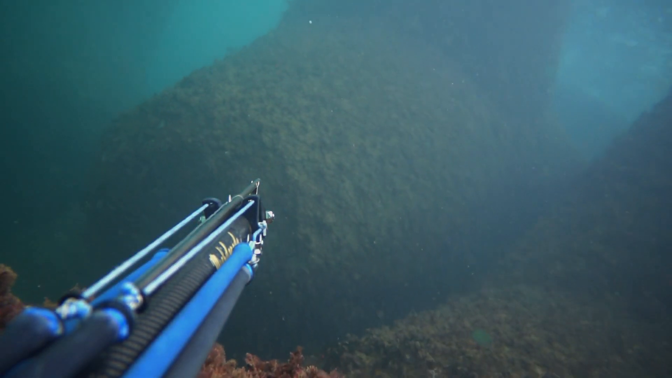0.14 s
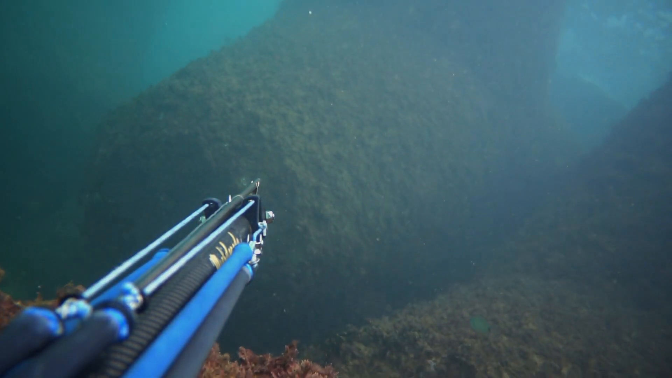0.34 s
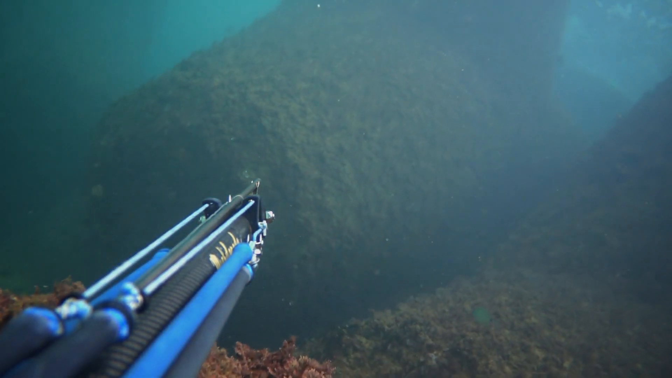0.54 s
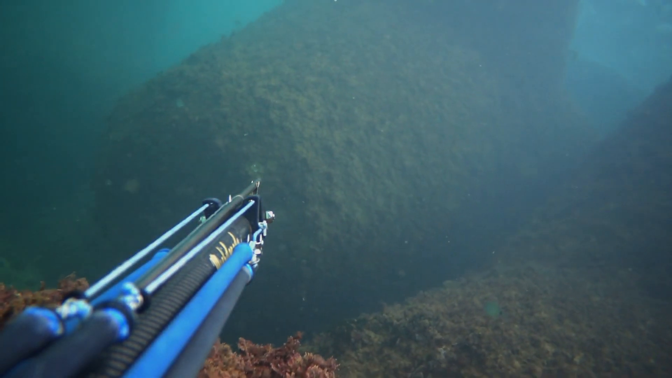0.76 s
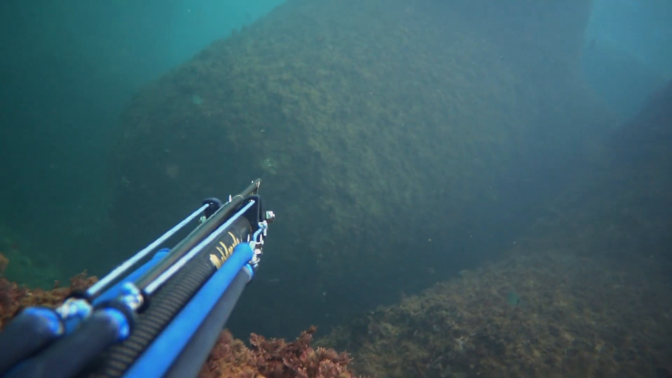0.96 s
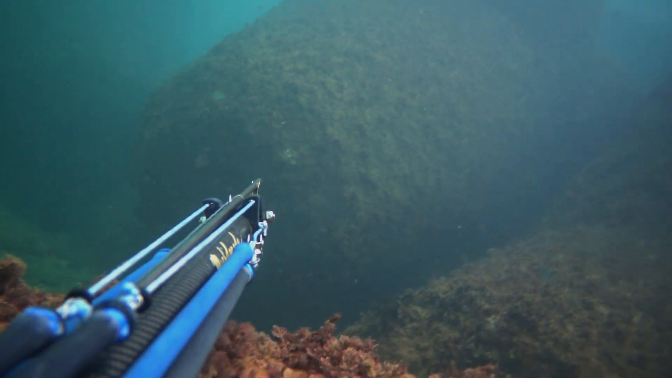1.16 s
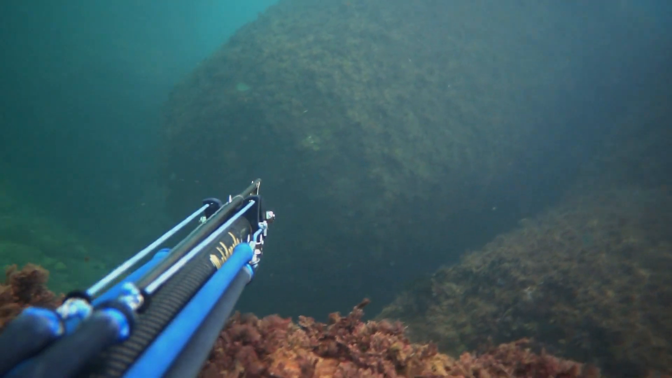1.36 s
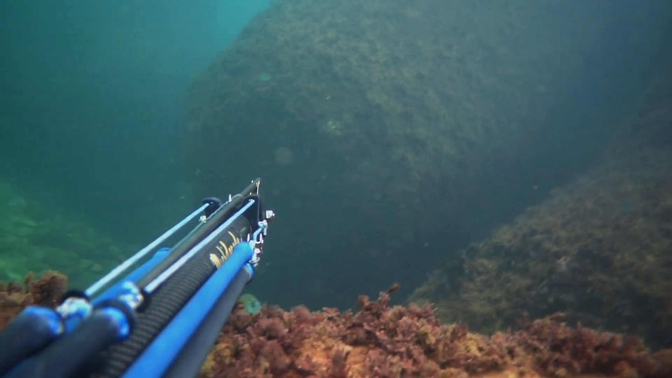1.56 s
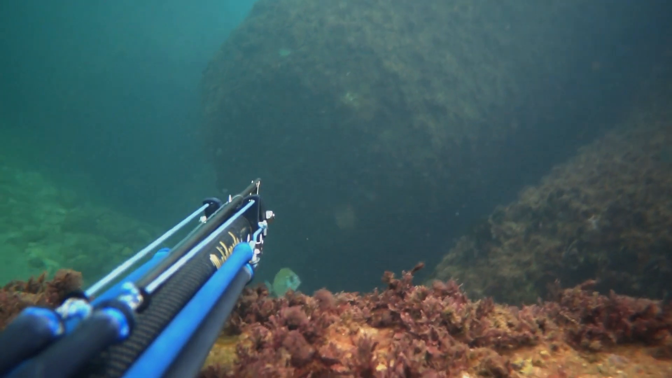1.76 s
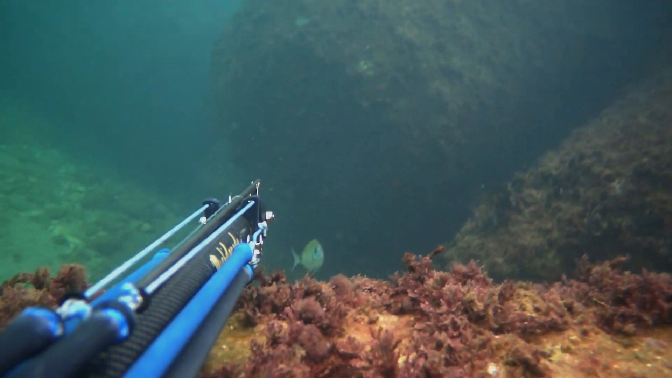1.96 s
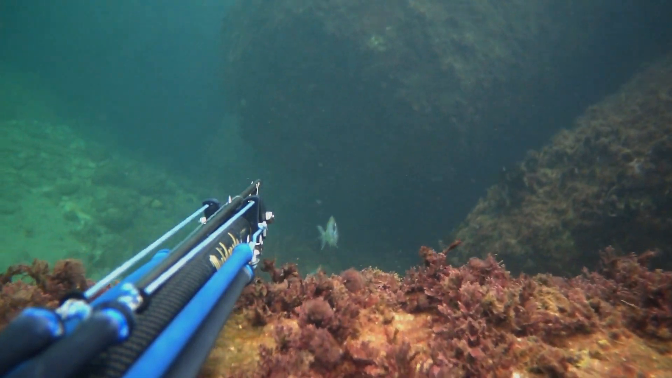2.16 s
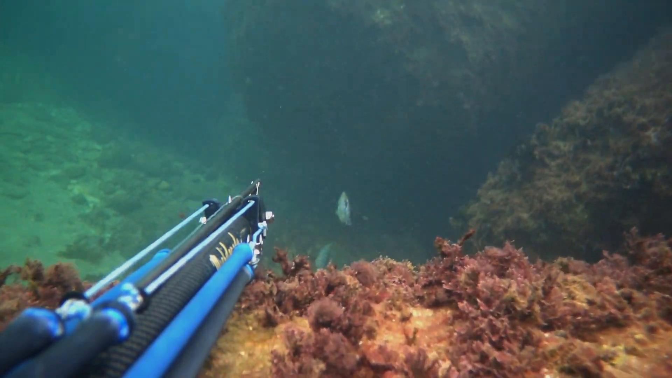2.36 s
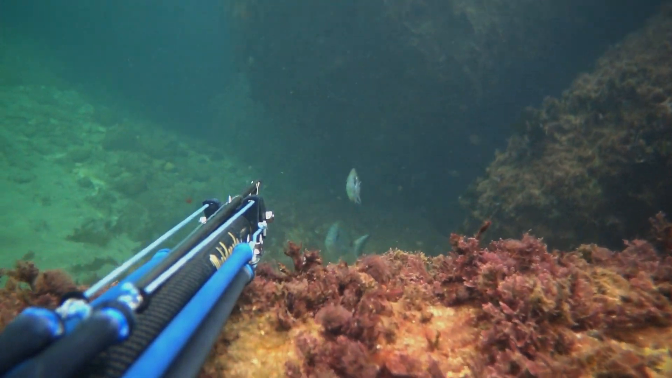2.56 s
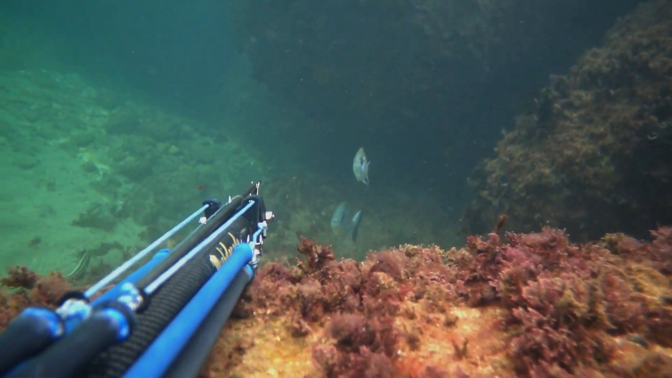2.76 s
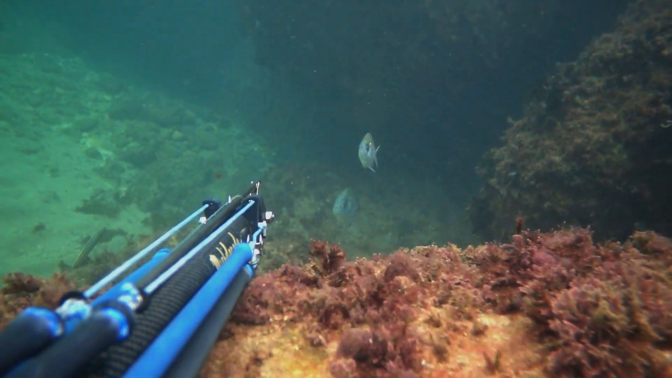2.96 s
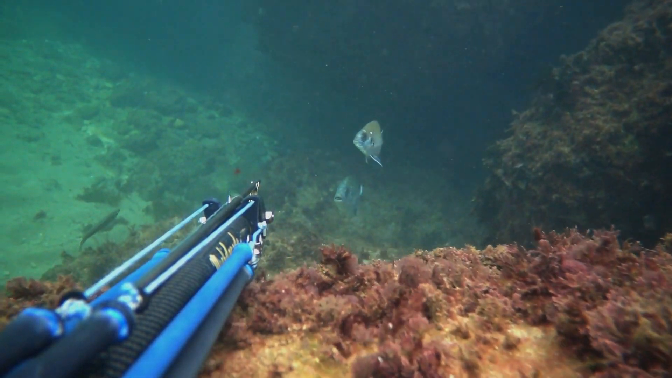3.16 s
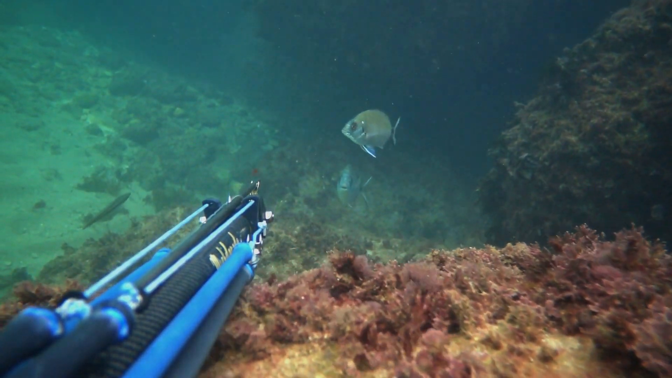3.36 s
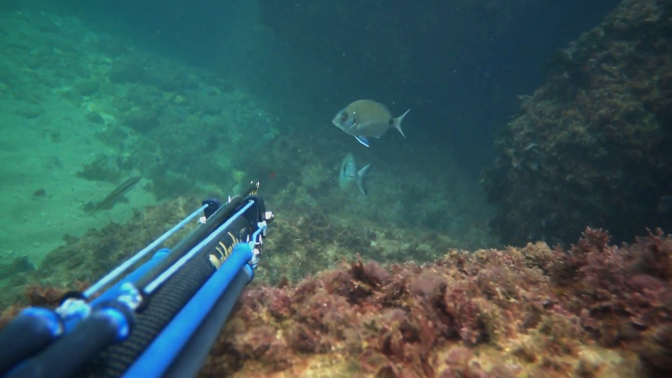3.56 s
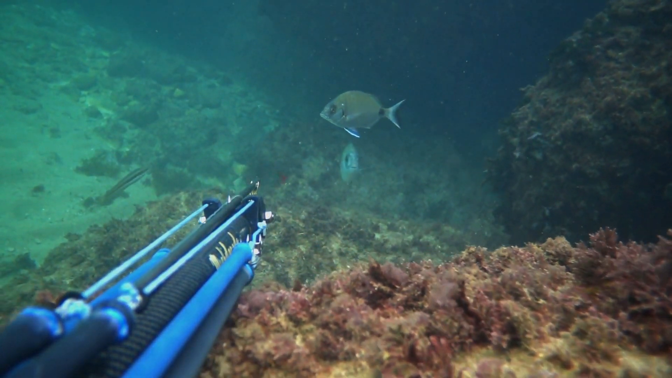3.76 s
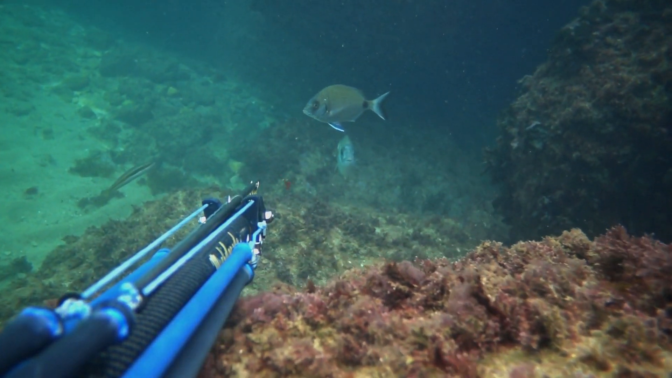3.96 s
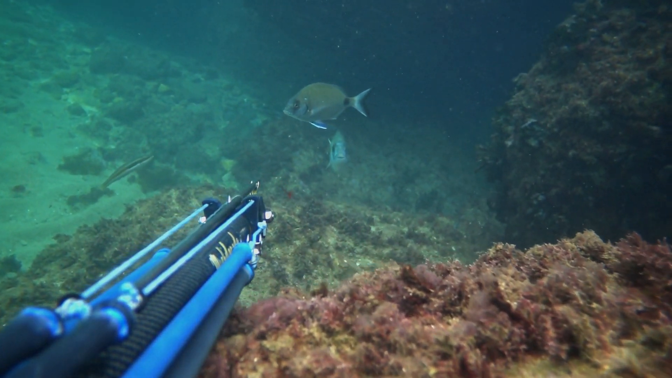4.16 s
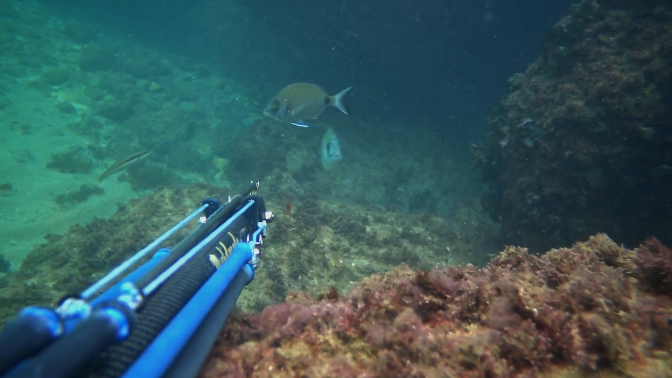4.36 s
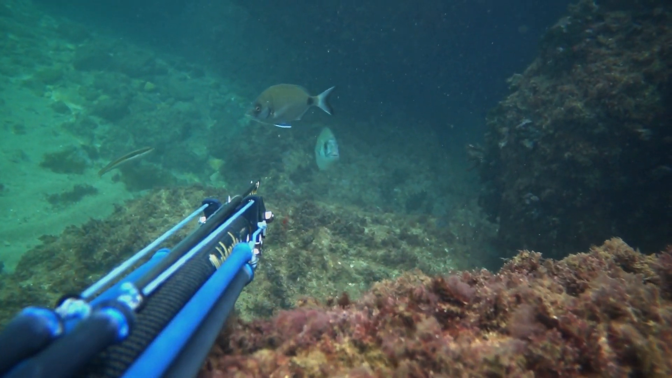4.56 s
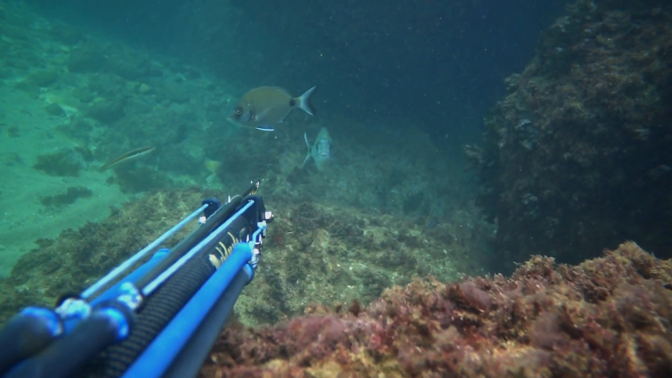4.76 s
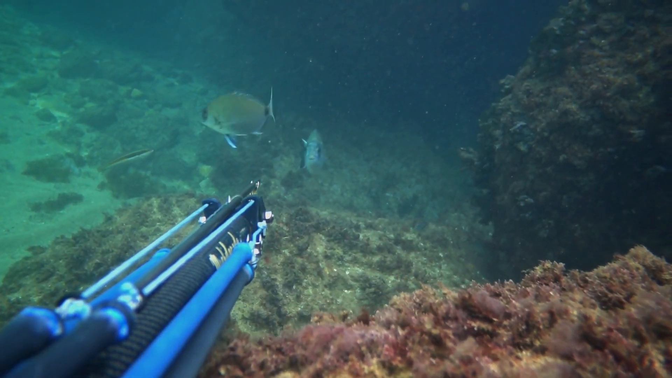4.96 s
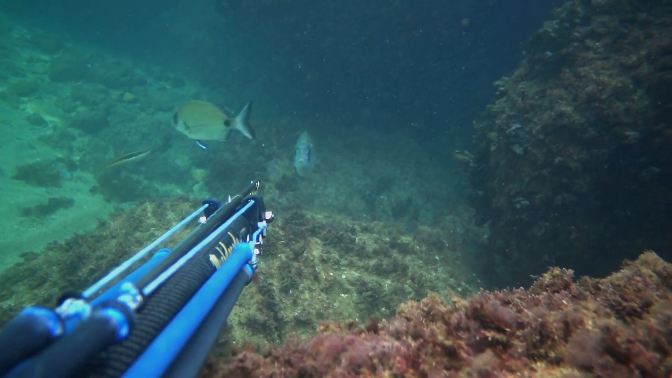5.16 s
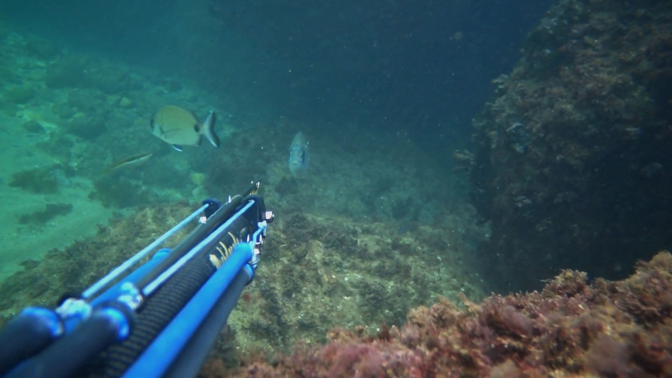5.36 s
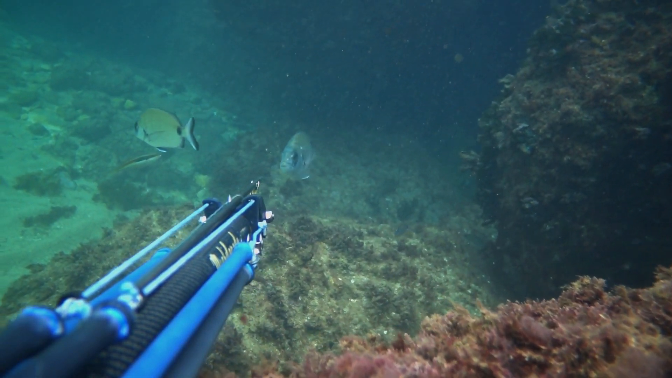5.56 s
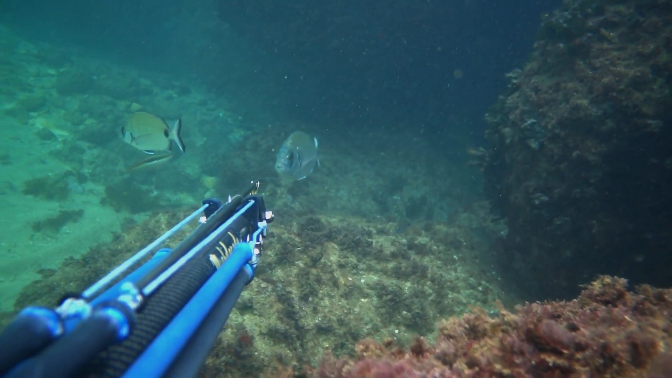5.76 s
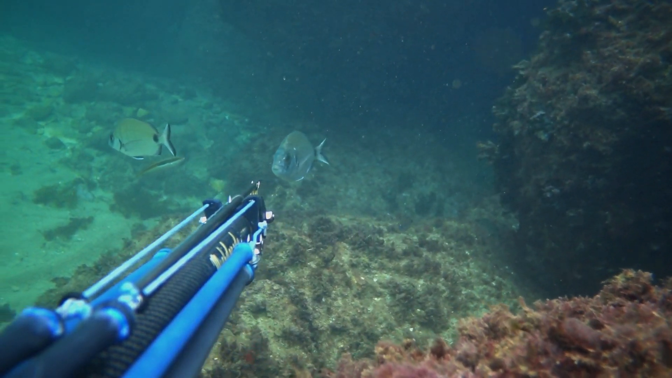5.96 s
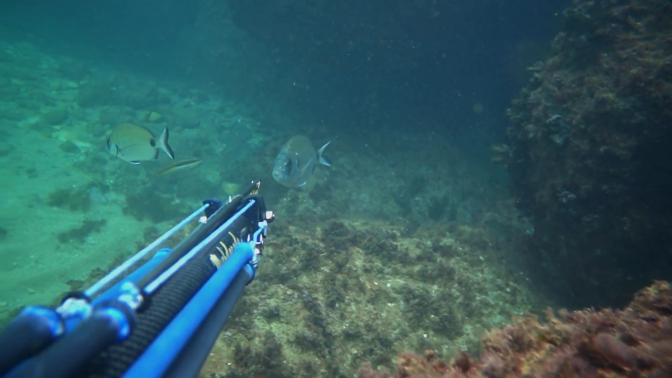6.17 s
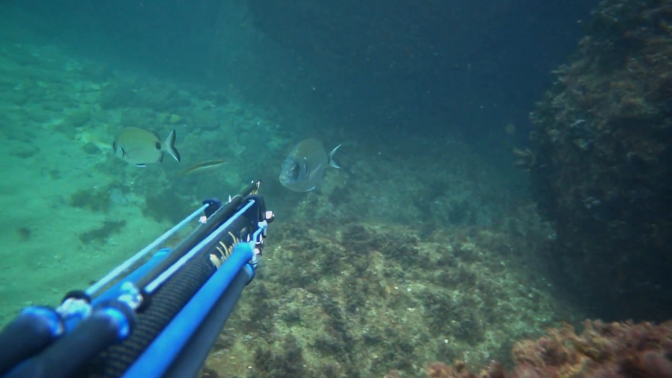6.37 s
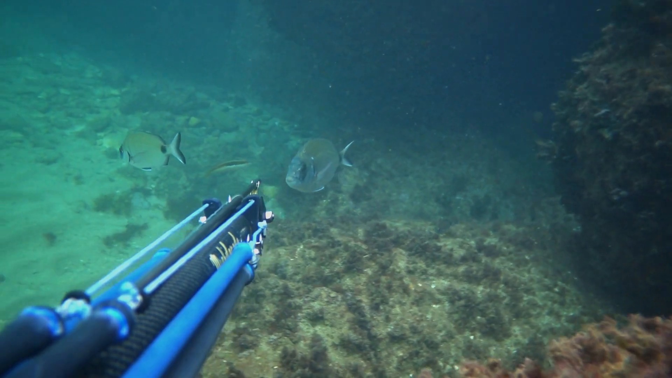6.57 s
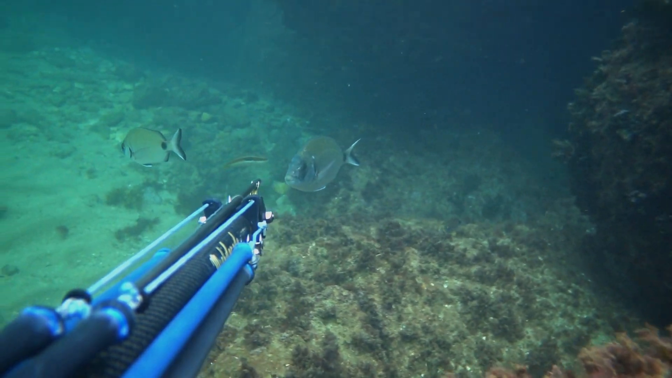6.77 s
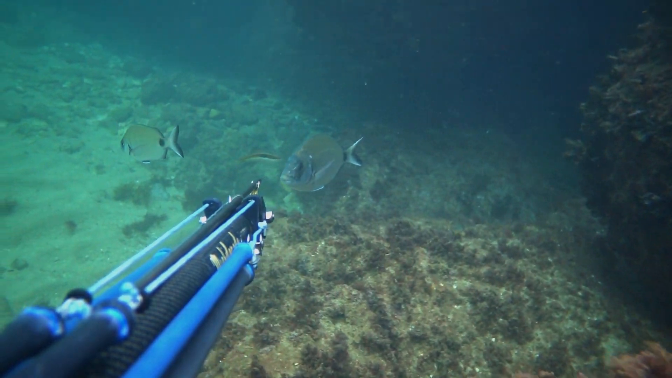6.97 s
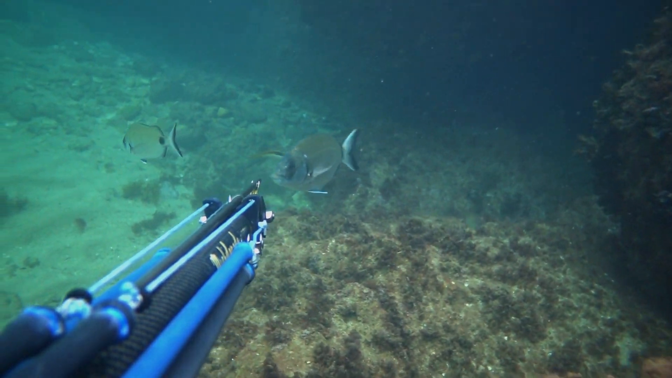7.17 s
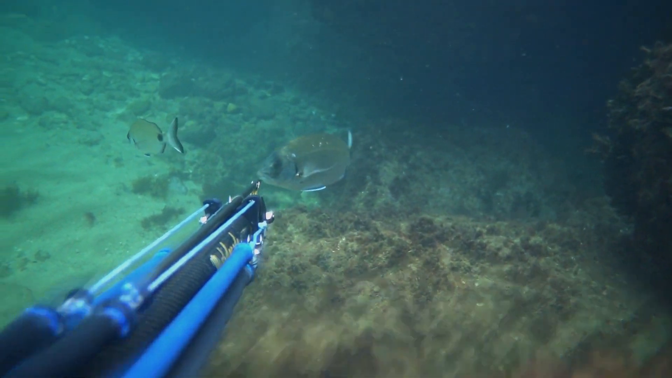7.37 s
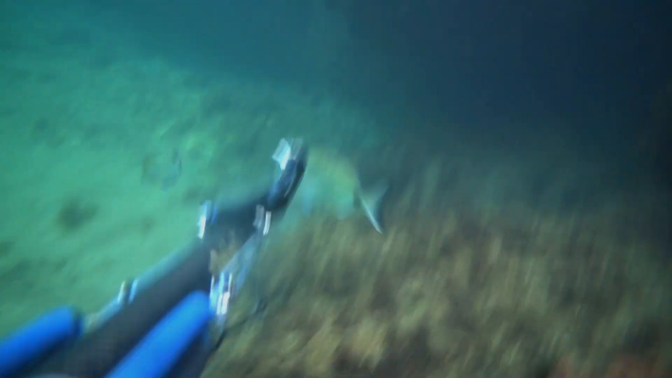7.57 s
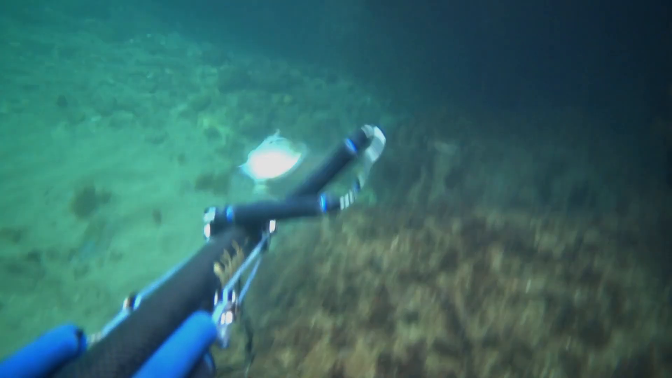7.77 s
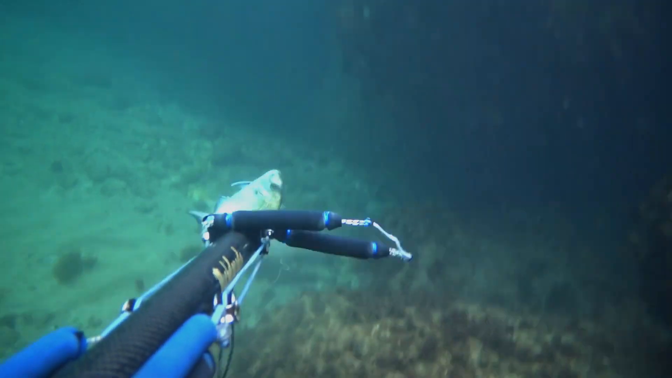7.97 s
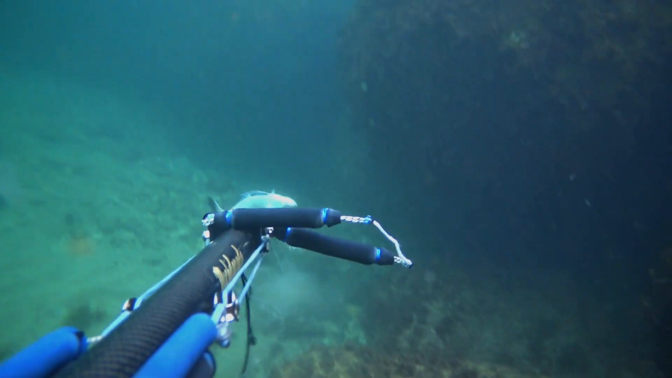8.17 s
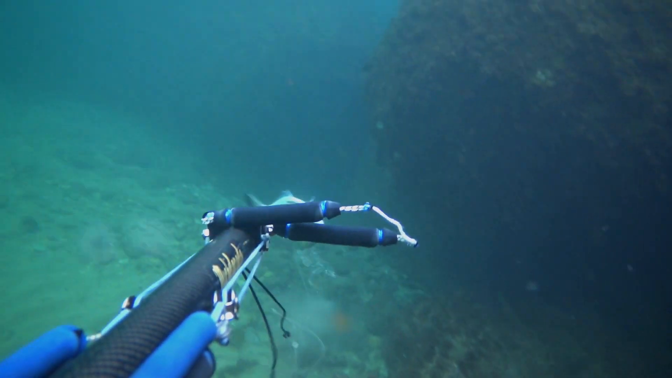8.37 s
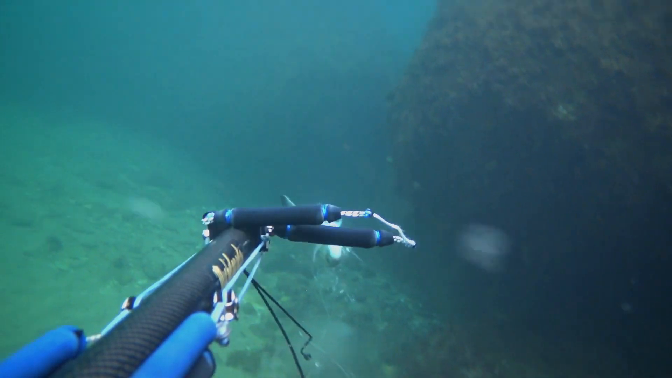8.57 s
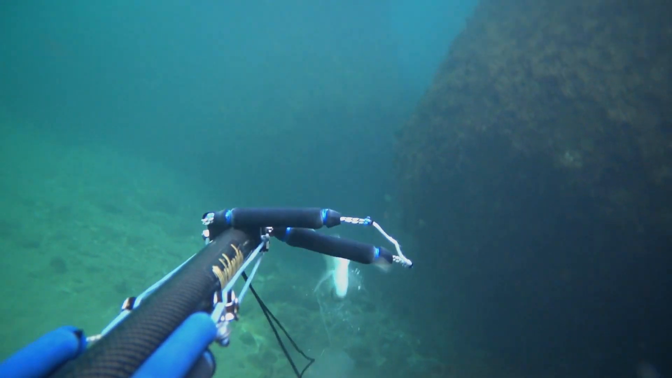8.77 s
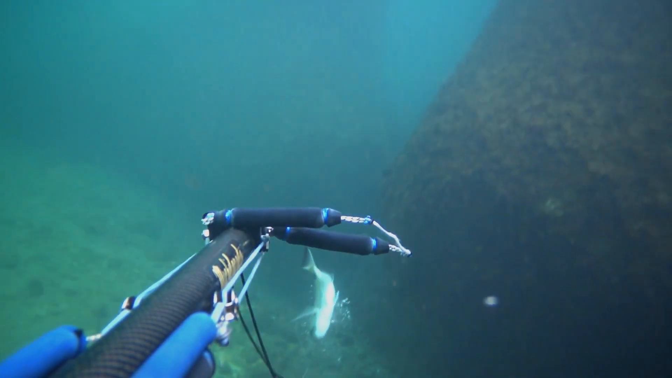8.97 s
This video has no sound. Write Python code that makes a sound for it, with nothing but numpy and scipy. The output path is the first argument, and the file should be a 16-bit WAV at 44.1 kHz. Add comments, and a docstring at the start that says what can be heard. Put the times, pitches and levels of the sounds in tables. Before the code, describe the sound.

Quiet underwater hiss with crackling shrimp and soft housing bumps, then a speargun fires with a loud thud, rattles and a brief metallic clink.

```python
"""Water stirs around a camera in a sealed housing on a speargun, while snapping shrimp crackle near and far.
Flow is shaped noise with tiny rising bubbles; snaps are short noise bursts; pushes and bubbles are swelling tones.
Then the gun fires: rubber bands whip and wobble in churning water, and parts rattle as bursts of noise.
Afterwards the loose steel shaft and a clip clink, as fading sine tones with a gritty scrape.
The air space in the housing colours many of these sounds with its fixed resonances."""
import sys
import numpy as np
from scipy import signal
from scipy.fft import rfft, irfft, next_fast_len
from scipy.io import wavfile
from scipy.ndimage import map_coordinates

SR = 44100
rng = np.random.default_rng(int(sys.argv[2]) if len(sys.argv) > 2 else 0)


def store_pcm(level_fs):
    """Save levels as 16-bit WAV."""
    pcm = np.round(np.clip(level_fs, -1, 1) * 32767).astype(np.int16)
    wavfile.write(sys.argv[1], SR, np.atleast_2d(pcm).T)


N = 397782  # length of the scene in samples

# Resonances of the air in the housing: (frequency [Hz], width [Hz], level [dB])
HOUSING_MODES = [(261.3, 116.4, -3), (395, 91, 0), (726, 50, -6.5), (982, 67.5, -9.5), (1172, 229, -13.5),
                 (2110, 317, -20), (2768, 283, -20.5), (3910, 930, -30.5), (5450, 690, -32)]
# The dip in the housing's response: (frequency [Hz], inner width [Hz], outer width [Hz])
HOUSING_DIP = (790, 62, 105)
# Likeness of the left and right sound: (frequency [Hz], likeness [0 to 1])
LEFT_RIGHT_LIKENESS = [(60, 0.77), (510, 0.8), (1470, 0.87), (4270, 0.76), (12400, 1)]
# Strength of the water moving over the housing: (time [s], level [dB])
FLOW_LEVEL = [(0, -58.5), (.43, -44), (.6, -54.5), (1.3, -51.5), (1.7, -45.5), (2.05, -51.5), (2.8, -50),
              (3.699, -53), (4.3, -47.5), (4.68, -50), (4.85, -54), (5.9, -50.5), (6.7, -42), (7.4, -40),
              (8.0, -31.5), (8.4, -41.5), (9.02, -41)]
# Near shrimp snaps: (time [s], peak level [dB], centre frequency [Hz])
NEAR_SNAPS = [(0.1297, -21.5, 1190), (0.5712, -32, 2070), (0.599, -36, 4060), (0.665, -39, 3200),
              (0.7048, -36, 3020), (0.738, -27.5, 1100), (0.7903, -29, 2000), (0.936, -25, 1350),
              (1.1393, -29.5, 2180), (1.368, -30, 2550), (2.213, -34.5, 1060), (2.8066, -23, 2170),
              (3.1313, -32.5, 2240), (3.6423, -38, 3300), (3.7638, -39, 4000), (3.96, -34, 2230),
              (4.0047, -30.5, 2440), (4.2408, -36.5, 3100), (4.634, -28.5, 2320), (5.658, -37, 2670),
              (5.6736, -22, 2230), (6.196, -31.5, 1940), (6.5308, -27, 2200), (6.662, -29.5, 2450),
              (6.72, -26.5, 2670), (7.0372, -28.5, 2590), (7.0842, -25, 2250), (7.3322, -35, 3200)]
# Colour of the microphone noise: (frequency [Hz], level [dB])
HISS_COLOUR = [(10800, -1.5), (12000, -6.5), (13000, -25)]
# Soft pushes on the housing: (time [s], peak level [dB], length scale [s])
PUSHES = [(0.001, -28, 0.017), (0.037, -30, 0.032), (0.245, -31.5, 0.026), (0.313, -36, 0.02),
          (0.356, -28, 0.052), (0.414, -28.5, 0.02), (0.435, -27.5, 0.028), (0.51, -32, 0.038),
          (1.151, -29.5, 0.03), (1.737, -28, 0.0086), (1.756, -33.5, 0.034), (1.869, -34.5, 0.026),
          (3.426, -15, 0.027), (3.463, -29, 0.015), (3.514, -23, 0.032), (7.443, -9, 0.014),
          (7.494, -7, 0.024), (7.524, -5.5, 0.03), (7.57, -7, .025), (7.604, -6, .014), (7.71, -13, .02),
          (7.806, -6.5, 0.0086), (7.895, -11, 0.021), (7.923, -13, 0.012), (8.213, -24.5, 0.02),
          (8.287, -28, .02), (8.592, -31, 0.032), (8.638, -22, 0.0094), (8.657, -28.5, .014),
          (8.746, -30, 0.014), (8.927, -26.5, 0.021)]
# Low heaves of the gun: (middle [s], level [dB], centre frequency [Hz], half length [s])
HEAVES = [(0.499, -58, 69, 0.12), (1.481, -51.5, 45.2, 0.044), (1.722, -49, 37.6, 0.16),
          (3.48, -47, 144, 0.083), (6.929, -50, 56.7, 0.027), (8.03, -41, 33.6, 0.24),
          (7.91, -29.5, 130, 0.026), (8.62, -40, 132, 0.035)]
# Single bubbles: (time [s], peak level [dB], pitch [Hz], length scale [s])
SINGLE_BUBBLES = [(1.629, -33, 1413, 0.014), (1.78, -28.5, 782, 0.02), (1.869, -33, 790, 0.019),
                  (6.963, -24.5, 1012, 0.01), (8.752, -38.5, 990, 0.016)]
# Knocks of the gun parts:
# (time [s], peak level [dB], centre frequency [Hz], 60 dB fade before limits [s], sharp edge over body [dB])
PART_KNOCKS = [(1.633, -29, 840, 0.022, -40), (4.262, -35, 800, 0.27, -40),
               (7.4335, -18.5, 1380, 0.078, -41), (7.457, 0, 1110, 0.059, -10),
               (7.515, -4, 715, 0.16, -13.5), (7.521, -12.5, 2200, 0.044, 0),
               (7.552, -16, 1490, 0.033, -3.5), (7.569, -8, 750, 0.061, -30),
               (7.611, -6.5, 770, 0.056, -19), (7.626, -7.5, 1200, 0.069, -19.5),
               (7.653, -15, 604, 0.017, -4.5), (7.6595, -3.5, 1820, 0.029, -21),
               (7.681, -32, 2800, 0.028, -12), (7.7735, -19, 1790, 0.018, -43),
               (7.797, -1, 1250, 0.026, -19), (7.885, -12, 1670, 0.058, -42),
               (7.918, -24.5, 1500, .03, -18), (7.933, -22.5, 1980, 0.04, -30),
               (8.029, -31, 2540, 0.028, -34), (8.046, -13.5, 1020, 0.021, -43),
               (8.396, -29, 2180, 0.13, -22), (8.588, -30.5, 990, 0.034, -50),
               (8.6295, -18, 1050, 0.032, -52), (8.639, -22, 1000, .03, -48),
               (8.959, -27.5, 1470, 0.065, -8)]
# Colour of the fizz and of the sharp edges of the knocks: (frequency [Hz], level [dB])
FIZZ_COLOUR = [(900, -3), (1800, 17), (3000, 3.5), (4300, -10.5), (11000, -44.5)]
# Layers of the shot, in order: band wobble, boom, churn, fizz, thin ticks, a rough band near 2 kHz:
# (level [dB], sag [dB/s], extra fall once the bands are slack [dB/s])
SHOT_LAYERS = [(-14, 17, 246), (-8.5, 30.5, 64), (-17.5, 55, -8), (-26, 49, 34), (-39.5, 132, -8),
               (-35.5, 28, -3)]
# Metal contacts: (time [s], peak level [dB], part [0 shaft, 1 clip], scrape over ring [dB])
METAL_CLINKS = [(8.094, -7.5, 0, -10.5), (8.102, -15, 0, -3), (8.341, -24.5, 1, 5), (8.3468, -23, 1, 12),
                (8.369, -27, 1, 3), (8.471, -39.5, 1, -12), (8.503, -42.5, 1, -8), (8.76, -41.5, 1, -40)]
# Tones of the steel shaft: (frequency [Hz], level before softening [dB], 60 dB fade [s])
SHAFT_TONES = [(740, 1.5, 0.05), (1244, -11, 0.16), (1740, -5, .05), (2487, -21, 0.34), (3090, -12, 0.06),
               (3725, -38, 0.3), (4942, -26, 0.22), (6395, -27, 0.08), (8554, -40, 0.2)]
CLIP_TONES = [(2210, -5.5, 0.034), (3016, 3.5, 0.081), (4290, -3, 0.045), (5840, -4, 0.021),
              (6900, -17, 0.06), (8260, -17, 0.035)]
# Fade of the grit by 60 dB: (shaft [s], clip [s])
GRIT_FADE = 0.1, 0.062

REFERENCE_FLOW_DB = -54.5  # flow at which wash, sway and slosh have their rest levels
WASH, SWAY, SLOSH = (-59.5, 1), (-61.5, 0.61), (-67.5, 0.84)  # (level at rest [dB], growth [dB per dB of flow])
PUSH_HZ, PUSH_SCATTER_HZ = 372.2, 9.2  # pitch of the pushes: average and random spread
SWELL_LEAD_S = 0.0086  # pushes and bubbles start this long before their listed time
TONE_FADE_HZ = 45  # the tone of a heave gets weaker as its pitch rises; half as strong here
FIRE_S, WHIP_UP_S, SLACK_AFTER_S = 7.432, 0.078, 0.32  # trigger, then times after it: full rise, slack bands
RECOVER_S, KNEE_DB, SQUEEZE = 0.6, -33, 0.1  # gain control: memory, onset, strength (an exponent)
TOP_HZ = 12990  # highest frequency kept


def amp(db):
    """Turn decibels into a plain multiplier."""
    return 10 ** (np.asarray(db) / 20)


def unit(x):
    """Scale a sound to an average strength (rms) of 1."""
    return x / np.sqrt(np.mean(x ** 2) + 1e-20)


def along(points, hz):
    """Read a (frequency, value) curve on a logarithmic frequency axis."""
    f, values = np.transpose(points)
    return np.interp(np.log(hz + 1), np.log(f + 1), values)


def wobble(rate, size=N):
    """Draw a smooth random curve with `rate` random points a second."""
    points = rng.standard_normal(int(size * rate / SR) + 4)
    coarse = np.arange(0, size + 64, 64)  # one smooth value every 64 samples
    smooth = map_coordinates(points, [coarse * rate / SR])
    return np.interp(np.arange(size), coarse, smooth)


def filtered(x, response):
    """Shape a sound by multiplying its spectrum with a response."""
    padded = next_fast_len(x.shape[-1] + 2048)
    spectrum = rfft(x, padded) * response(np.fft.rfftfreq(padded, 1 / SR))
    return irfft(spectrum, padded)[..., :x.shape[-1]]


def peak(f, hz, width_hz):
    """Response of one resonance: strongest at its own frequency, weaker on both sides."""
    return 1j * f * width_hz / (hz * hz - f * f + 1j * f * width_hz)


def housing(f):
    """The air space round the microphones boosts its resonances and weakens one narrow region."""
    modes = 0
    for k, (centre, width, db) in enumerate(HOUSING_MODES):
        modes = modes + (-1) ** k * amp(db) * peak(f, centre, width)  # neighbours have opposite signs
    hz, inner, outer = HOUSING_DIP
    return modes * (hz * hz - f * f + 1j * f * inner) / (hz * hz - f * f + 1j * f * outer)


def spread(pair, response):
    """Mix two unrelated signals into a stereo pair of rms 1, with the set likeness at each frequency."""
    def mid_and_side(f):
        angle = np.arccos(np.clip(along(LEFT_RIGHT_LIKENESS, f), -1, 1)) / 2
        return response(f) * [np.cos(angle), np.sin(angle)]

    mid, side = filtered(pair, mid_and_side)
    return unit(np.array([mid + side, mid - side]))


def noise(response, lump_db, rate, size=N):
    """Make coloured stereo noise whose strength varies in lumps."""
    lumps = amp(lump_db * wobble(rate, size=size))
    return spread(rng.standard_normal((2, size)) * lumps, response)


def add(out, s, db, pan_db, wave):
    """Place a stereo event at its peak level; pan_db is how much louder the left side is."""
    start = max(round(s * SR), 0)
    wave = wave[:, :N - start] / np.abs(wave.mean(0)).max()
    sides = np.array([[0.5], [-0.5]]) * pan_db
    out[:, start:start + wave.shape[1]] += amp(db + sides) * wave


def burst(t60, response, side, echo_db, rise_s):
    """A sharp crack of noise, then a scattered tail, a little different on each side."""
    t = np.arange(SR // 10) / SR
    crack = amp(-60 * np.maximum(t - 0.002, 0) / 0.012)
    tail = amp(echo_db + 4 * wobble(350, size=len(t)) - 60 * t / np.clip(t60, 0.004, 0.2))
    shared, apart = rng.standard_normal((2, len(t))) * (crack + tail)
    pair = np.array([shared + side * apart, shared - side * apart])
    return filtered(pair, response) * (1 - np.exp(-t / rise_s))


def crackle(response, t60, count, size=N):
    """Many random snaps of one colour, each with a short fading tail; loud ones are rare."""
    draw = rng.random((count, 2))
    clicks = np.zeros(size)
    clicks[(draw[:, 0] * size).astype(int)] = amp(-6.5 * np.log(draw[:, 1] + 0.035))
    fade = amp(-60 * np.arange(SR // 20) / SR / t60)
    tails = signal.oaconvolve(clicks, fade)[:size]
    return spread(rng.standard_normal((2, size)) * tails, response)


def water():
    """Flow rings the housing and gurgles round it; wash, sway and slosh grow with the flow."""
    s, db = np.transpose(FLOW_LEVEL)
    flow_db = np.interp(np.arange(N) / SR, s, db)
    extra_db = flow_db - REFERENCE_FLOW_DB
    wash, sway, slosh = (amp(rest_db + growth * extra_db) for rest_db, growth in (WASH, SWAY, SLOSH))
    low = noise(lambda f: housing(f) * peak(f, 343, 250), lump_db=2.5, rate=34)
    fine = noise(lambda f: housing(f) * peak(f, 650, 860) ** 2, lump_db=4.0, rate=37)
    fine = fine + amp(-10.0) * gurgle()
    rumble = noise(lambda f: peak(f, 21.0, 27) ** 2, lump_db=3.5, rate=14.0)
    slop = noise(lambda f: peak(f, 130, 139) ** 2, lump_db=5.5, rate=9.8)
    return amp(flow_db) * low + wash * fine + sway * rumble + slosh * slop


def gurgle(count=260):
    """Small random bubbles: tones of a few cycles that rise in pitch, heard through the housing."""
    out = np.zeros((2, N))
    t = np.arange(SR // 20) / SR
    for when, pitch, loudness, side in rng.random((count, 4)):
        hz = 600 * 2.1 ** pitch
        u = t * hz / 5  # time counted in units of five cycles
        wave = np.sin(2 * np.pi * hz * t * (1 + 0.029 * u)) * u * np.exp(-2.5 * u)
        db = -5.5 * np.log(loudness + 0.025)
        add(out, when * N / SR, db, 6.1 * (side - 0.5), np.array([wave, wave]))
    return unit(filtered(out, lambda f: np.abs(housing(f)) ** 0.69))


def shrimp():
    """Far snaps, dull to bright, melt into a crackle; near snaps stand out, each in its own colour."""
    def no_bass(f):
        return peak(f, 3170, 8540) ** 2

    out = amp(-61) * crackle(lambda f: housing(f) * peak(f, 1490, 1400) ** 2, 0.038, count=600)
    out += amp(-60.0) * crackle(lambda f: housing(f) * peak(f, 2280, 2000) ** 2, 0.044, count=800)
    out += amp(-69) * crackle(lambda f: housing(f) * peak(f, 4850, 2500) ** 2, 0.022, count=900)
    # a steady bed of noise under the separate snaps
    out += amp(-60) * noise(lambda f: housing(f) * no_bass(f), lump_db=1.5, rate=2.935)
    for s, db, hz in NEAR_SNAPS:
        def colour(f):
            return np.abs(housing(f)) ** 0.79 * peak(f, hz, 0.79 * hz) * no_bass(f)

        wave = burst(0.066, colour, side=0.15, echo_db=0.5, rise_s=0.00045)
        add(out, s, db, rng.normal(0, 2.8), wave)
    return out


def microphone_hiss():
    """The microphones' own noise: level up to the treble, then falling away."""
    return amp(-71) * noise(lambda f: amp(along(HISS_COLOUR, f)), lump_db=-0.35, rate=15.0)


def swells(rows, rough_db, sag):
    """Short tones swell and fade, sagging in pitch if sag is above 0, with rough water around them."""
    def rough_colour(f):
        return peak(f, 450, 1800) ** 4 * np.abs(housing(f)) ** 0.5

    out = np.zeros((2, N))
    for s, db, hz, length in rows:
        u = np.arange(round(3 * np.clip(length, 0.005, 0.1) * SR)) / SR / length
        # a small random phase difference between left and right
        phase = 2 * np.pi * rng.random() + np.array([[0.2], [-0.2]]) * rng.normal()
        tone = np.sin(2 * np.pi * hz * length * u * (1 + sag * (1 - u)) + phase)
        rough = unit(filtered(rng.standard_normal((2, len(u))), rough_colour))
        wave = (tone * u + amp(rough_db) * rough * u ** 1.25) * np.exp(-2.2 * u * u)
        add(out, s - SWELL_LEAD_S, db, rng.normal(0, 1.9), wave)
    return out


def nudges():
    """Soft pushes make the housing ring near one pitch, which sags a little each time."""
    pushes = [(s, db, rng.normal(PUSH_HZ, PUSH_SCATTER_HZ), length) for s, db, length in PUSHES]
    return swells(pushes, rough_db=-14.5, sag=0.044)


def heaves():
    """Each heave of the gun is a low tone that swells and fades, with rough water round it."""
    out = np.zeros((2, N))
    t = np.arange(SR) / SR - 0.5
    for s, db, hz, half in HEAVES:
        raw = rng.standard_normal(SR) + 0.083 * rng.standard_normal((2, SR))
        rough = unit(filtered(raw, lambda f: peak(f, 0.88 * hz, 1.43 * hz) ** 2))
        tone = np.sqrt(2) * np.sin(2 * np.pi * (hz * t + rng.random()))
        tone = tone * TONE_FADE_HZ / (TONE_FADE_HZ + hz)
        wave = amp(db) * (tone + amp(3.5) * rough) * np.exp(-(t / half) ** 2)
        at = round(s * SR) - SR // 2 + np.arange(SR)
        inside = (at >= 0) & (at < N)
        out[:, at[inside]] += wave[:, inside]
    return out


def bubbles():
    """Single bubbles sound as short tones of steady pitch."""
    return swells(SINGLE_BUBBLES, rough_db=-11.5, sag=0)


def rattles():
    """Gun parts knock together: each knock has a dull noisy body and a sharp, shorter edge."""
    out = np.zeros((2, N))
    for s, db, hz, t60, edge_db in PART_KNOCKS:
        def body_colour(f):
            return np.abs(housing(f)) ** 1.06 * peak(f, hz, 1.25 * hz) ** 2

        def edge_colour(f):
            return amp(along(FIZZ_COLOUR, f)) * peak(f, 7960, 8200) ** 2

        pan_db = rng.normal(0, 1.3)
        body = burst(t60, body_colour, side=0.23, echo_db=13, rise_s=0.0014)
        edge = burst(0.43 * t60, edge_colour, side=0.29, echo_db=9, rise_s=0.00025)
        add(out, s, db, pan_db, body)
        add(out, s, db + edge_db, pan_db, edge)
    return out


def whip(level_db, sag_db, fall_db):
    """Loudness in the second after the trigger: a quick rise, a sag, and another slope once bands are slack."""
    t = np.arange(SR) / SR
    rise = np.clip(t / WHIP_UP_S, 0, 1)
    return rise * amp(level_db - sag_db * t - fall_db * np.maximum(t - SLACK_AFTER_S, 0))


def shot():
    """The freed rubber bands wobble at a low pitch while water booms, churns and fizzes round the barrel."""
    bands, boom, churn, fizz, ticks, rasp = (whip(*row) for row in SHOT_LAYERS)
    band_hz = 33 + 2.4 * wobble(12.2, size=SR)
    tone = np.sin(2 * np.pi * np.cumsum(band_hz) / SR)
    body = np.sqrt(2) * bands * tone * np.ones((2, 1))
    body += amp(1.0) * bands * noise(lambda f: peak(f, 44.5, 42.5) ** 3, lump_db=3.5, rate=9.0, size=SR)
    body += boom * noise(lambda f: np.abs(housing(f)) ** 0.32 * peak(f, 283, 550) ** 3,
                         lump_db=2.5, rate=46.6, size=SR)
    body += churn * noise(lambda f: np.abs(housing(f)) ** 0.4 * peak(f, 910, 1320) ** 2,
                          lump_db=3, rate=90, size=SR)
    body += rasp * noise(lambda f: peak(f, 1960, 300) ** 2, lump_db=5, rate=68, size=SR)
    body += fizz * crackle(lambda f: amp(along(FIZZ_COLOUR, f)), 0.013, count=220, size=SR)
    body += ticks * crackle(lambda f: peak(f, 9300, 5000) ** 3, 0.004, count=260, size=SR)
    out = np.zeros((2, N))
    start = round(FIRE_S * SR)
    out[:, start:start + SR] = body
    return out


def steel():
    """Each clink is a gritty scrape coloured by the part's resonances, with its fuzzy, wavering ring."""
    out = np.zeros((2, N))
    t = np.arange(SR // 3) / SR
    for s, db, part, scrape_db in METAL_CLINKS:
        modes = (SHAFT_TONES, CLIP_TONES)[round(part)]
        # a gentler contact starts softer and wakes fewer high tones
        gentle_db = min(scrape_db + 6, 0)
        ring = 0
        for hz, level, t60 in modes:
            drift = np.cumsum(rng.normal(0, 0.02, len(t)))  # random phase drift makes the ring fuzzy
            tone_db = level + 1.5 * wobble(40, size=len(t)) + gentle_db * hz / 5000 - 60 * t / t60
            ring = ring + amp(tone_db) * np.sin(2 * np.pi * hz * t + drift)

        def grit_colour(f):
            resonances = sum(amp(0.6 * level) * np.abs(peak(f, hz, 1000)) ** 2 for hz, level, _ in modes)
            return resonances / (1 + (f / 10000) ** 16)

        raw = rng.standard_normal(len(t)) + 0.43 * rng.standard_normal((2, len(t)))
        grit = unit(filtered(raw, grit_colour))
        scrape = amp(scrape_db - 60 * t / GRIT_FADE[round(part)]) * grit
        onset = 1 - np.exp(-t / (0.0014 - gentle_db / 4000))
        add(out, s, db, 0, (ring + scrape) * onset)
    return out


def scene():
    """Add all the sounds together."""
    background = water() + shrimp() + microphone_hiss()
    movement = nudges() + heaves() + bubbles()
    gun = rattles() + shot() + steel()
    return background + movement + gun


def record(dry):
    """Gain control ducks a little after loud sound; the input saturates softly and drops the top treble."""
    keep = np.exp(-1 / (RECOVER_S * SR))
    power = signal.lfilter([1 - keep], [1, -keep], dry.mean(0) ** 2)
    ducked = dry * (1 + power / amp(2 * KNEE_DB)) ** -SQUEEZE  # doubled dB, as power is a square
    held = ducked / (1 + np.abs(ducked / 0.88) ** 5) ** (1 / 5)
    return filtered(held, lambda f: f < TOP_HZ)


dry = scene()
out = record(dry)
store_pcm(out)
```